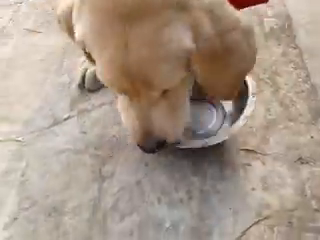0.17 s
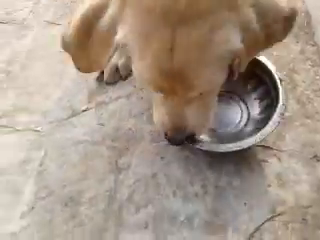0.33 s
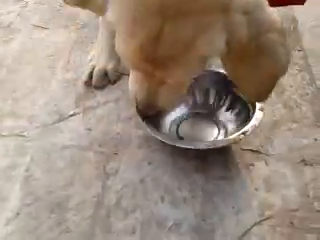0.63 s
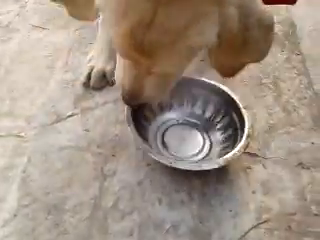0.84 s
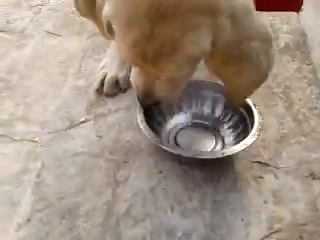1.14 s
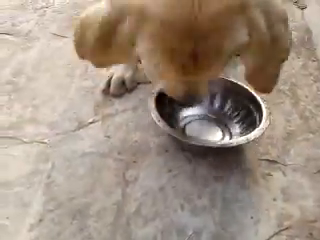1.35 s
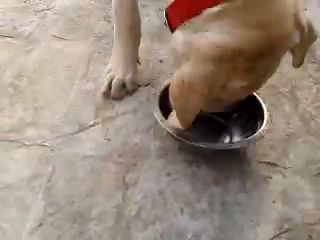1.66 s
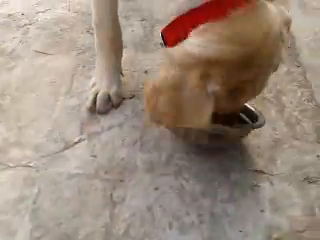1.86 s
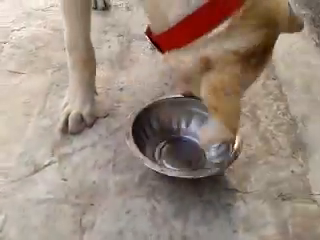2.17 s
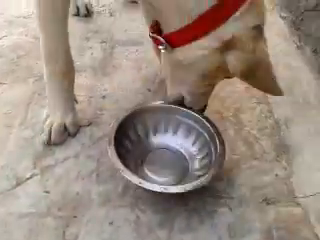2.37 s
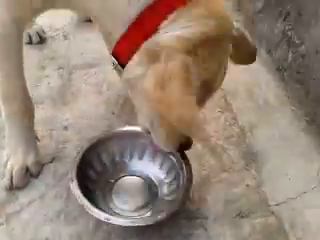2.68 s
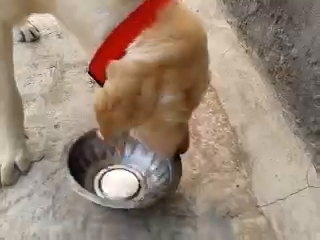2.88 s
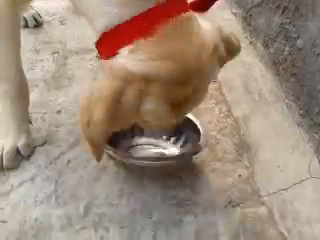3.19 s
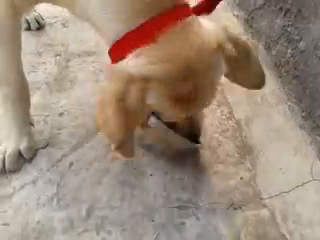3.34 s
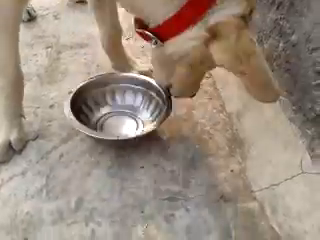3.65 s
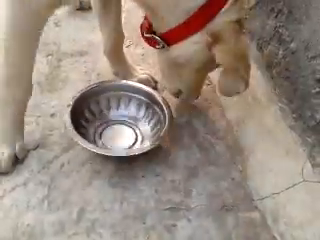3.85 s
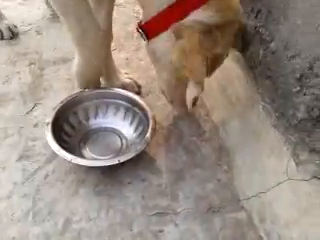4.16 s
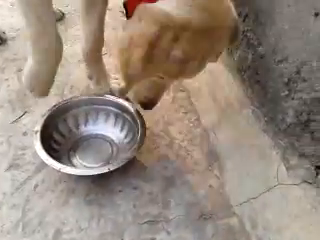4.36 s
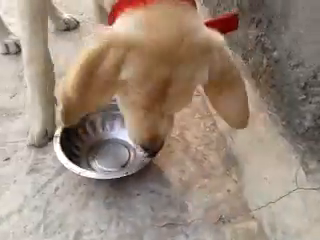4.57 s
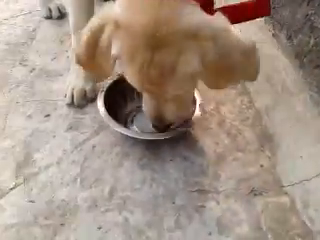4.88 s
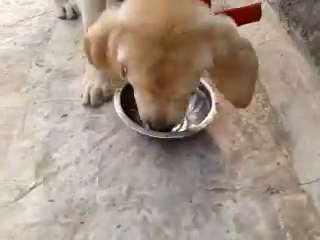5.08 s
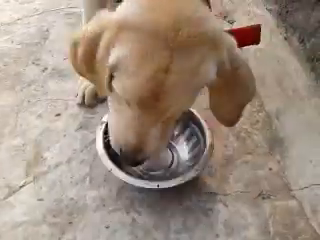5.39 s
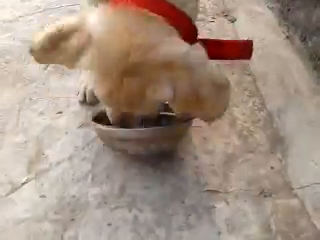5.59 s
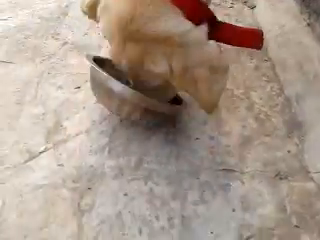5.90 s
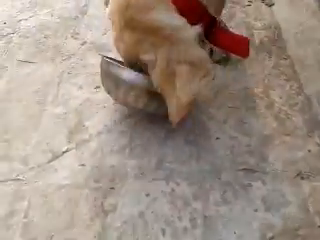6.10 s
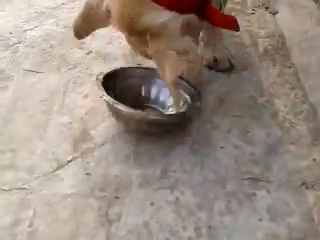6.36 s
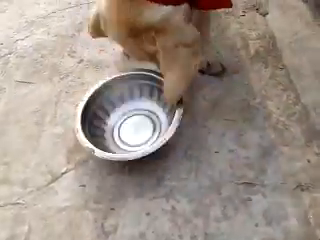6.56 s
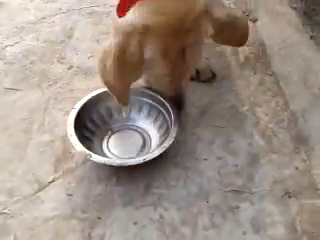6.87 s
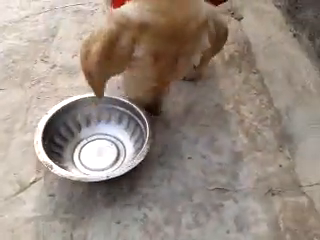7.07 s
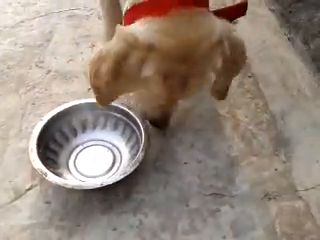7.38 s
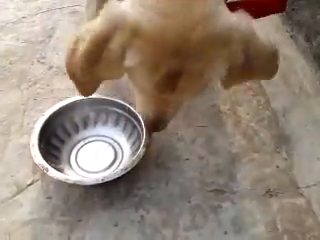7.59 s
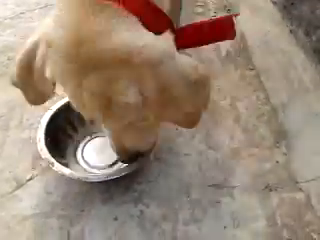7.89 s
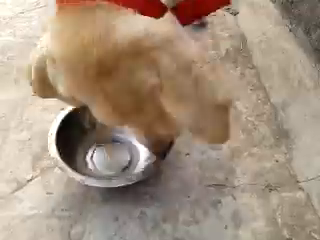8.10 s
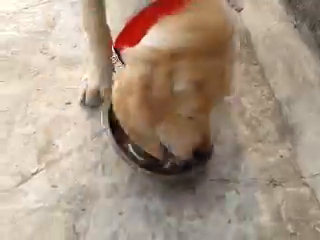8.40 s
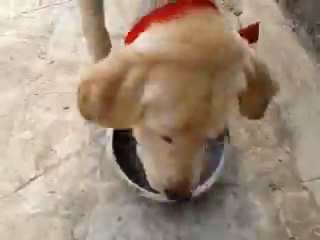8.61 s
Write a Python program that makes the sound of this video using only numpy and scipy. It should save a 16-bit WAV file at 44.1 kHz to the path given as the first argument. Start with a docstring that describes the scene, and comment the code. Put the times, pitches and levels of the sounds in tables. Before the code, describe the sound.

A dog licks and noses an empty steel bowl over gritty concrete, with constant scraping, bright clanks, ringing and wet tongue smacks.

```python
"""A dog licks and noses an empty steel bowl across a concrete yard, close to a phone's microphone.
Over a low outdoor rumble it opens on grit scraping, the base juddering as it is shoved, and clanks of steel;
edge ticks and wet tongue smacks follow, then flat knocks of the base on the floor. The muzzle damps the steel;
when the bowl drops free its lowest mode rings on. Later the dragged base groans, a faint hollow tone
passes in the lull, and near the end the dog sniffs. Struck steel is summed modes plus a noisy clash."""
import sys
import numpy as np
from scipy import signal
from scipy.fft import rfft, irfft, next_fast_len
from scipy.io import wavfile
from scipy.ndimage import uniform_filter1d, minimum_filter1d, map_coordinates

SR = 44100
rng = np.random.default_rng(int(sys.argv[2]) if len(sys.argv) > 2 else 0)


def write(x):
    x = np.atleast_2d(x).T
    wavfile.write(sys.argv[1], SR, np.round(np.clip(x, -1, 1) * 32767).astype(np.int16))


N = 385434
RING = np.arange(SR * 3 // 10) / SR  # time axis of one contact's answer (s)
ONSET = SR // 32  # first moments, over which a contact's level is set (samples)


def amp(db):
    """Decibels to gain."""
    return 10 ** (np.asarray(db) / 20)


def unit(x):
    """Scale to rms 1."""
    return x / np.sqrt(np.mean(x ** 2) + 1e-20)


def wobble(rate):
    """A random curve, straight between knots, rate knots a second."""
    knots = rng.standard_normal(int(N * rate / SR) + 4)
    return map_coordinates(knots, [np.arange(N) * rate / SR], order=1)


def noise(points, size, lo=0, hi=np.inf):
    """Noise of rms 1 with a (Hz, dB) spectrum, kept between lo and hi."""
    hz = np.fft.rfftfreq(size, 1 / SR)
    f, db = np.transpose(points)
    gain = amp(np.interp(np.log(hz + 1), np.log(f), db)) * (hz >= lo) * (hz < hi)
    return unit(irfft(rfft(rng.standard_normal(size)) * gain, size))


def add(track, s, sound):
    """Mix a sound into a track from time s on."""
    part = track[max(round(s * SR), 0):][:len(sound)]
    part += sound[:len(part)]


# Outdoor background, its spectrum: pitch_hz, level_db (per Hz, relative)
YARD_SPECTRUM = [(15, -38.5), (25, -7), (127, -4), (575, -20), (2050, -32), (7000, -56)]
YARD_DB = -43


def yard():
    """A low outdoor rumble: shaped noise whose level shifts slightly."""
    return amp(YARD_DB + 0.28 * wobble(15)) * noise(YARD_SPECTRUM, next_fast_len(N))[:N]


# The bowl's clear modes: pitch_hz, level_db (relative, within its register), t60_s
BOWL_MODES = [(705.0, -23, 1.95), (915.0, -0.5, 0.33), (1028.0, -16.0, 0.28), (1580.0, -10.5, 0.36),
              (1653.0, -11.5, 0.56), (1696.0, -11.0, 0.53), (2417.0, -8, 0.11), (2466.0, -8.5, 0.11),
              (2907.0, -13.0, 0.27), (3052.0, -9.5, 0.16), (3101.0, -11, 0.15), (3927.0, -8, 0.3),
              (4231.0, -7, 0.35), (4290.0, -6.5, 0.35), (4587.0, -12.0, 0.38), (4667.0, -15, 0.37),
              (4728.0, -16, 0.3), (4936.0, -15.5, 0.31), (5039.0, -11.0, 0.32), (5195.0, -19, 0.33),
              (5394.0, -16.0, 0.28), (5542.0, -5.5, 0.26), (5749.0, -7.0, 0.25), (5915.0, -9.0, 0.26),
              (6115.0, -14.0, 0.27), (6374.0, -13.0, 0.22), (6460.0, -9.0, 0.21), (6573.0, -11.5, 0.2)]
# The crowd of short-lived modes between the clear ones: pitch_hz, level_db (per Hz, relative)
CLASH_SPECTRUM = [(100, -22.5), (250, -7), (600, -7.5), (1050, 5), (1330, -21.5), (1650, 14.5),
                  (2100, -10.5), (2450, 0), (2720, -37), (3050, 6.5), (3550, 0.5), (4080, -1.5), (4260, 5),
                  (4450, 9), (5250, -7.5), (5700, 8.5), (7300, -2)]
# Edges of the five registers, base, wall, shoulder, lip and rim: edge_hz
REGISTER_EDGES = [40, 1250, 2200, 3800, 4450, 7400]


def steel(register, clash_db, clash_t60, settle_s, scatter_db=4.5, detune=0.0022, waver=0.0036,
          beat=0.29, beat_hz=35):
    """One register's answer to a contact; every contact point stirs and loads the modes differently."""
    lo, hi = REGISTER_EDGES[register:register + 2]
    modes = [mode for mode in BOWL_MODES if lo <= mode[0] < hi]
    hz, db, t60 = np.transpose(modes)[:, :, None]
    size, bend, split, grip = rng.standard_normal((4, len(hz), 1))
    t, step = RING, SR // 100
    # the load keeps shifting as the bowl rolls, so each mode wavers in pitch
    load = rng.standard_normal((len(hz), len(t) // step + 1))
    load = np.repeat(load, step, axis=1)[:, :len(t)]
    turns = np.cumsum(hz * (1 + detune * bend + waver * load), axis=1) / SR
    # the bowl is not quite round, so each mode splits and beats, differently at every contact
    beating = 1 + beat * np.cos(np.float32(2 * np.pi * beat_hz * split * t))
    # muzzle and floor close in on the steel and choke the tail
    fade_db = -60 * t / t60 - 10 * (t / settle_s) ** 2 * np.exp(grip / 2)
    level = amp(np.float32(db + scatter_db * size + fade_db))
    ring = np.sum(beating * level * np.sin(np.float32(2 * np.pi * turns)), axis=0)
    clash = noise(CLASH_SPECTRUM, len(t), lo, hi) * amp(-60 * t / clash_t60)
    both = ring / np.std(ring[:ONSET]) + amp(clash_db) * clash / np.std(clash[:ONSET])
    return both / np.std(both[:ONSET])


def rubbed(force, register, clash_db, settle_s):
    """A running force rings the bowl, the contact point changing every eighth of a second."""
    out, hop = np.zeros(N), SR // 8
    for i in range(0, N, hop):
        stretch = force[i:i + hop]
        if stretch.any():
            answer = steel(register, clash_db, 0.021, settle_s)
            add(out, i / SR, signal.fftconvolve(stretch, answer / np.linalg.norm(answer)))
    return out


def grit(rate, spread_db):
    """Grains of uneven size that catch at random, rate a second; rms 1."""
    caught = rng.random(N) < rate / SR
    return unit(caught * rng.choice([-1, 1], N) * amp(spread_db * rng.standard_normal(N)))


# The muzzle pushes the bowl over grit: start_s, end_s, push_db, bright_db (rim over wall)
PUSH_STROKES = [(0, 0.211, -18, -1), (0.206, 0.352, -37.5, -5), (0.421, 0.542, -28.5, -1),
                (0.63, 0.666, -24, -4.5), (0.712, 0.913, -20.5, 1.5), (0.972, 1.247, -20, 0),
                (1.28, 1.533, -34.5, 1), (1.583, 1.913, -18, -8), (2.087, 2.254, -26.5, 6),
                (2.221, 2.586, -20.5, -3.5), (2.823, 2.929, -15.5, 2), (3.242, 3.498, -21, 5),
                (3.628, 3.792, -22.5, -2.5), (3.806, 4.331, -23, -4), (4.854, 5.412, -34.5, -19),
                (5.405, 5.804, -19, -3.5), (5.931, 5.995, -31.5, -2), (6.198, 6.425, -41.5, 2),
                (6.416, 6.541, -23.5, 8), (6.689, 6.805, -18.5, -3.5), (6.846, 6.975, -24.5, -4),
                (7.044, 7.402, -17, -5.5), (8.068, 8.183, -31, -2.5), (8.167, 8.317, -20.5, -1),
                (8.581, 8.713, -20, 1.5)]
# a push takes hold, then the bowl coasts to rest (s)
PUSH_ATTACK_S, PUSH_RELEASE_S = 0.008, 0.032


def scrape(jerk_db=6.5, rest_db=-58):
    """Sand hisses and coarse grains tick under the jerking bowl; the shoulder is clear of the floor."""
    t = np.arange(N) / SR
    rim_push, wall_push = np.full((2, N), amp(rest_db))
    for start, end, db, bright_db in PUSH_STROKES:
        attack = np.clip((t - start) / PUSH_ATTACK_S + .5, 0, 1) ** 2
        stroke = attack * np.exp(-np.clip((t - end) / PUSH_RELEASE_S + 1, 0, 20))
        rim_push = rim_push + amp(db + bright_db) * stroke
        wall_push = wall_push + amp(db) * stroke
    sand = unit(grit(1800, spread_db=4.5) * amp(jerk_db * wobble(90)))
    force = unit(sand + grit(130, spread_db=3.0))
    lip_push = np.sqrt(rim_push * wall_push)
    edge = amp(-7.0) * rubbed(force * rim_push, 4, clash_db=-0.5, settle_s=0.092)
    lip = amp(-10) * rubbed(force * lip_push, 3, clash_db=-7.5, settle_s=0.077)
    shoulder = amp(-16.5) * rubbed(force * wall_push, 2, clash_db=-3.5, settle_s=0.18)
    wall = amp(-11.5) * rubbed(force * wall_push, 1, clash_db=-6, settle_s=0.11)
    base = amp(-16.5) * rubbed(force * wall_push, 0, clash_db=-0.5, settle_s=0.27)
    return edge + lip + shoulder + wall + base


# Shoves that make the base stick and slip: start_s, length_s, level_db (relative)
BASE_SHOVES = [(0.0, 0.076, -23.5), (0.773, 0.044, -19), (0.943, 0.072, -25.5), (3.422, 0.042, -15.5),
               (3.814, 0.055, -26), (6.328, 0.21, -37.5), (6.688, 0.09, -23.5), (7.132, 0.13, -29.5),
               (8.575, 0.038, -22.5), (8.635, 0.043, -16.5)]


def judder(slips_hz=130):
    """The flat base sticks and slips at an uneven rate while it is shoved."""
    force = np.zeros(N)
    for s, length, db in BASE_SHOVES:
        times = np.cumsum(rng.uniform(.4, 1.6, 32)) / slips_hz
        for t in times[times < length]:
            slip = amp([db + rng.normal(0, 4.7)]) * np.sqrt(SR / slips_hz)
            add(force, s + t, slip)
    return rubbed(force, 0, clash_db=-14.5, settle_s=0.15)


# each bounce is weaker; the rim chatters longest (dB a bounce)
BOUNCE_LOSS_DB, RIM_LOSS_DB = 5, 3
SPREAD_S = 0.00056  # a blow takes a moment to spread round the bowl


def chatter(fall_db, count=6, gap_s=.003, uneven_db=2):
    """A blow is a burst of quick contacts, each about fall_db weaker than the one before."""
    delays = np.cumsum(np.append(0, gap_s * rng.uniform(.3, 1.7, count - 1)))
    sizes = amp(uneven_db * rng.standard_normal(count) - fall_db * np.arange(count))
    return np.bincount(np.round(delays * SR).astype(int), sizes / np.linalg.norm(sizes))


def blow(answer, bounces):
    """An answer repeated at every bounce; rms 1 over its first moments."""
    spread = 1 - np.exp(-RING / SPREAD_S)
    sound = signal.fftconvolve(answer * spread, bounces)[:len(RING)]
    return sound / np.std(sound[:ONSET])


def rim():
    """The bright, quickly choked clash of the struck edge."""
    return steel(4, clash_db=3.5, clash_t60=0.048, settle_s=0.093)


# The bowl strikes the concrete, or a tooth its shoulder; where it is hit decides what rings:
# start_s, wall_db, shoulder_db, rim_db
CLANK_BLOWS = [(0.0024, -20, -35, -26), (0.0277, -18.5, -31, -16), (0.1443, -25.5, -57, -18.5),
               (0.4918, -32.5, -37.5, -29.5), (0.6757, -29.5, -29, -22), (0.7657, -21.5, -24, -21.5),
               (0.8521, -22.5, -27, -18.5), (0.9872, -26, -19.5, -20.0), (1.0735, -18, -23.0, -24.5),
               (1.1259, -19.5, -20, -17.0), (1.2258, -24, -25, -22.5), (1.4004, -27, -28, -23.5),
               (1.6199, -23.5, -16.0, -19.5), (1.645, -32.5, -25, -50), (1.7619, -18, -7.5, -12.5),
               (1.9855, -33.5, -29.5, -21), (2.288, -24.0, -21.5, -7.5), (2.3284, -28, -20.5, -15.5),
               (2.511, -26, -29.5, -32), (2.6862, -42.5, -37.5, -38.5), (2.8273, -21.5, -18.5, -8),
               (2.9556, -30, -42.5, -26), (3.049, -23.5, -21.5, -20), (3.0909, -27, -30, -22),
               (3.3758, -27.0, -46, -21), (3.4228, -25.5, -26, -18.5), (3.4412, -28.0, -28.5, -21),
               (3.8344, -28.0, -37, -22), (3.964, -20, -22.5, -25.5), (4.0994, -29, -30.5, -34),
               (4.224, -32, -30.5, -32), (4.2618, -31.5, -31.5, -32), (4.8855, -33.5, -31, -34),
               (4.9043, -29.5, -26, -23.5), (4.999, -35, -34.5, -35), (5.094, -32.5, -30.5, -29.5),
               (5.1719, -34, -39, -39), (5.5323, -26, -21, -20.5), (5.6038, -31, -17.0, -16),
               (5.655, -30.5, -25, -15.5), (5.777, -30, -28.5, -28.5), (6.3003, -37, -50, -32),
               (6.3442, -38, -41, -32), (6.6991, -17.5, -27.0, -32), (6.8985, -25, -30.5, -24.5),
               (7.0567, -29, -41, -23), (7.083, -35, -29.5, -30.5), (7.1248, -26, -31, -24),
               (7.223, -32.5, -22, -16.5), (8.167, -32, -33, -32), (8.2311, -28, -28.5, -19.0),
               (8.4528, -28, -40.5, -20.5), (8.5608, -35.5, -50, -26)]
# base and floor against the wall, lip against the mean of wall and rim (dB)
BASE_DB, THUD_DB, LIP_DB = -6, -22, -1


def clanks():
    """Each blow rings the five registers of the bowl, and the floor answers with a dull thud."""
    out = np.zeros(N)
    for s, wall_db, shoulder_db, rim_db in CLANK_BLOWS:
        bounces, rim_bounces = chatter(BOUNCE_LOSS_DB), chatter(RIM_LOSS_DB)
        base = blow(steel(0, clash_db=6, clash_t60=0.026, settle_s=0.88), bounces)
        wall = blow(steel(1, clash_db=-7.0, clash_t60=0.059, settle_s=0.14), bounces)
        shoulder = blow(steel(2, clash_db=-3.5, clash_t60=0.038, settle_s=0.24), bounces)
        lip = blow(steel(3, clash_db=-7, clash_t60=0.075, settle_s=0.11), bounces)
        floor = noise(CLASH_SPECTRUM, len(RING), lo=66, hi=620) * amp(-60 * RING / 0.028)
        thud = blow(floor, bounces)
        edge = blow(rim(), rim_bounces)
        low = amp(wall_db + BASE_DB) * base + amp(wall_db) * wall + amp(wall_db + THUD_DB) * thud
        lip_db = (wall_db + rim_db) / 2 + LIP_DB
        high = amp(shoulder_db) * shoulder + amp(lip_db) * lip + amp(rim_db) * edge
        add(out, s, low + high)
    return out


# The edge alone ticks on the concrete: start_s, level_db
EDGE_TICKS = [(0.064, -18), (0.2786, -33.0), (2.0889, -24), (2.5473, -19), (3.2912, -21.5), (3.451, -37),
              (3.7137, -13), (3.917, -21), (5.424, -29.5), (5.472, -27), (6.377, -26), (6.4278, -17),
              (6.8507, -23), (7.18, -26.5), (8.636, -21)]


def ticks():
    """Only the rim register rings, at each bounce of the edge."""
    out = np.zeros(N)
    for s, db in EDGE_TICKS:
        add(out, s, amp(db) * blow(rim(), chatter(RIM_LOSS_DB)))
    return out


# Tongue and teeth click wetly on the steel: start_s, level_db (before SMACK_DB)
WET_SMACKS = [(0.1206, -15), (0.186, -19), (1.7453, -17), (2.422, -16), (2.4403, -16), (4.0386, -22),
              (4.301, -20.5), (5.0937, -17.5), (5.2327, -30), (5.5318, -11), (5.569, -20.5),
              (5.5847, -14.5), (5.605, -19)]
# gain (dB), middle pitch (Hz), its log scatter, life (s)
SMACK_DB, SMACK_HZ, SMACK_SPREAD, SMACK_T60 = -3, 3600, 0.028, 0.058


def licks(slap_db=-13, slap_t60=0.021):
    """Wet smacks, each with a pitch of its own, over the dull slap of the tongue."""
    out = np.zeros(N)
    for s, db in WET_SMACKS:
        hz = SMACK_HZ * np.exp(SMACK_SPREAD * rng.standard_normal())
        peak = [(hz / 2, -36), (hz * .8, -8), (hz, 0), (hz * 1.25, -8), (hz * 2, -30)]
        smack = amp(-60 * RING / SMACK_T60) * noise(peak, len(RING))
        slap = amp(slap_db - 60 * RING / slap_t60) * noise(CLASH_SPECTRUM, len(RING), lo=500, hi=830)
        add(out, s, amp(db + SMACK_DB) * (smack + slap))
    return out


# The flat base slaps down on the concrete: start_s, level_db (relative)
BASE_KNOCKS = [(0.778, -15), (1.074, -14.5), (1.375, -23), (1.773, -20.5), (2.292, -15), (2.829, -19.5),
               (3.834, -15.5), (5.472, -24), (5.748, -24.5), (5.772, -19.5), (6.899, -12.5), (7.16, -26)]


def knocks(thud_db=-6, thud_t60=0.0039):
    """The base lands flat: a hollow knock over a short, dull thud."""
    out = np.zeros(N)
    for s, db in BASE_KNOCKS:
        thud = amp(thud_db - 60 * RING / thud_t60) * noise(CLASH_SPECTRUM, len(RING), lo=210, hi=280)
        knock = amp(-8.0) * steel(0, clash_db=-0.5, clash_t60=0.047, settle_s=0.3)
        add(out, s, amp(db) * (thud + knock))
    return out


# The bowl stands clear of the muzzle: land_s, touched_s, level_db (lowest mode)
FREE_DROPS = [(1.078, 1.4, -32.5), (2.296, 2.733, -32), (2.908, 3.137, -32), (3.419, 3.581, -37),
              (3.832, 4.846, -25), (6.903, 7.3, -33.5)]


def free_ring(damped_t60=0.32):
    """Left standing, the bowl sings on in its lowest mode until the muzzle damps it."""
    hz, _, t60 = BOWL_MODES[0]
    out, t = np.zeros(N), np.arange(2 * SR) / SR
    for s, touched, db in FREE_DROPS:
        fade_db = -60 * t / t60 - 60 * np.maximum(s + t - touched, 0) / damped_t60
        add(out, s, amp(db + fade_db) * np.sin(2 * np.pi * hz * t))
    return out


def glide(points, waver_rate, ramp_s=0.008):
    """A rough, wavering tone that follows (s, Hz, dB) points."""
    s, hz, db = np.transpose(points)
    t = np.arange(N) / SR
    turn = 2 * np.pi * np.cumsum(np.interp(t, s, hz)) / SR
    band = unit(wobble(waver_rate) * np.sin(turn) + wobble(waver_rate) * np.cos(turn))
    ends = np.clip(np.minimum(t - s[0], s[-1] - t) / ramp_s, 0, 1)
    return band * amp(np.interp(t, s, db)) * ends


# The base is dragged round: time_s, pitch_hz, level_db
GROAN_PATH = [(3.632, 850, -28), (3.71, 905, -25), (3.785, 935, -38.5)]


def groan():
    """The dragged base groans upwards in pitch, a tone roughened by fast random wavering."""
    return glide(GROAN_PATH, waver_rate=130)


# A faint tone in the lull: time_s, pitch_hz, level_db
HOLLOW_PATH = [(4.63, 1086, -60), (4.715, 1185, -52.5), (4.78, 1254, -53.5), (4.86, 1160, -64.5)]


def hollow_tone():
    """A faint hollow tone rises and sinks, wavering more slowly than the groan."""
    return glide(HOLLOW_PATH, waver_rate=70)


# The dog sniffs at the rim: middle_s, half_length_s, level_db
SNIFF_PUFF = (7.82, .09, -44)


def sniff():
    """A soft puff of air: band noise that swells and fades."""
    s, half, db = SNIFF_PUFF
    swell = np.exp(-((np.arange(N) / SR - s) / half) ** 2)
    breath = [(500, -16), (1600, -12.0), (4000, -14.0), (7300, -21.0)]
    return amp(db) * swell * noise(breath, next_fast_len(N), lo=380)[:N]


def shifting(x, patchy_db, width_hz=420, hold_s=0.02):
    """The contact wanders over the steel, favouring now some pitches, now others."""
    hz, t, z = signal.stft(x, SR, nperseg=512)
    knots = rng.standard_normal((160, 1200))
    places = np.meshgrid(hz / width_hz, t / hold_s, indexing="ij")
    field = map_coordinates(knots, places, order=1, mode="wrap")
    return signal.istft(z * unit(amp(patchy_db * field)), SR, nperseg=512)[1][:N]


def scene():
    """The bowl in the open yard."""
    sliding = shifting(scrape(), patchy_db=4.0)
    struck = shifting(clanks() + ticks(), patchy_db=3.5)
    bowl = sliding + judder() + struck + knocks() + free_ring() + groan()
    return (yard() + bowl + licks() + hollow_tone() + sniff())[None]


def record(dry):
    """The phone's limiter ducks the loudest peaks; a steep low-pass then sets its band limit."""
    ceiling, span, top_hz = .9, SR // 1000, 7300
    needed = np.minimum(1, ceiling / (np.abs(dry) + 1e-9))
    held = dry * uniform_filter1d(minimum_filter1d(needed, 2 * span), span)
    return signal.sosfiltfilt(signal.ellip(8, .2, 50, top_hz, fs=SR, output="sos"), held)


dry = scene()
out = record(dry)
write(out)
```